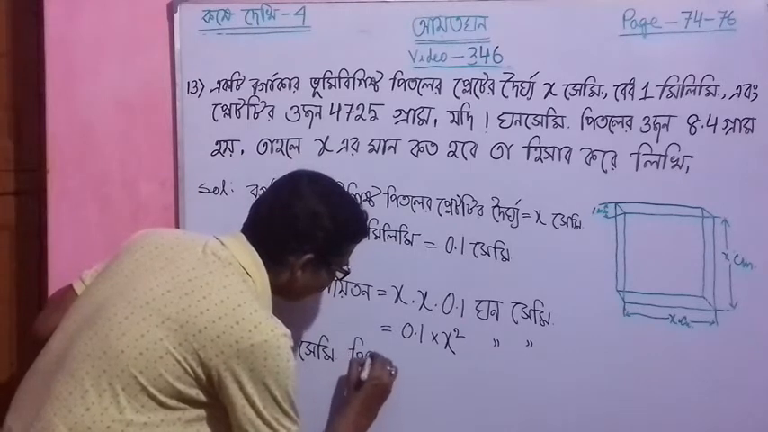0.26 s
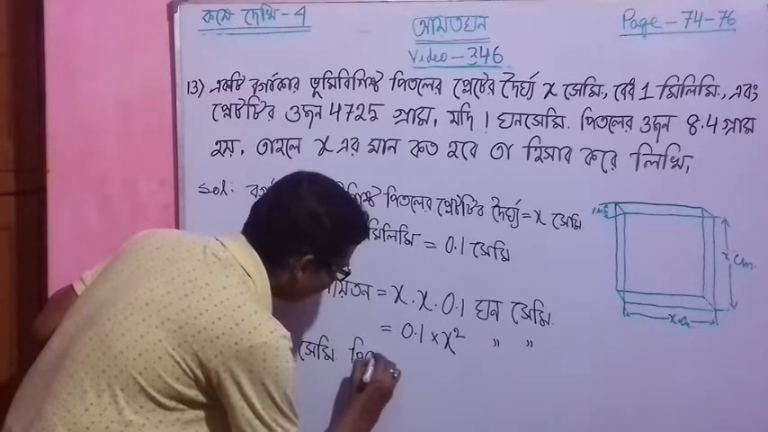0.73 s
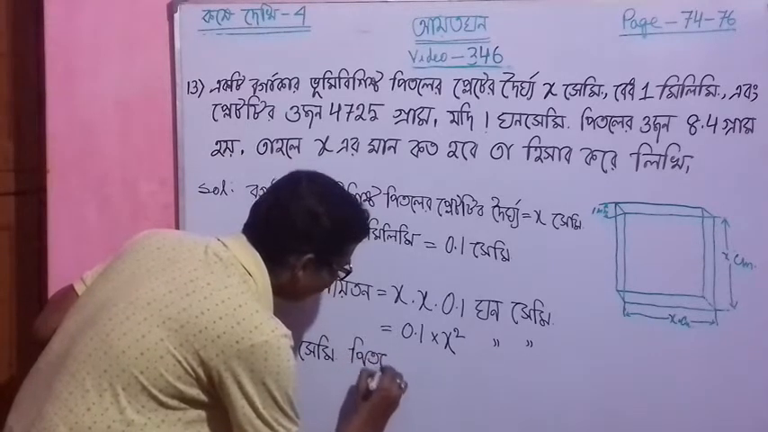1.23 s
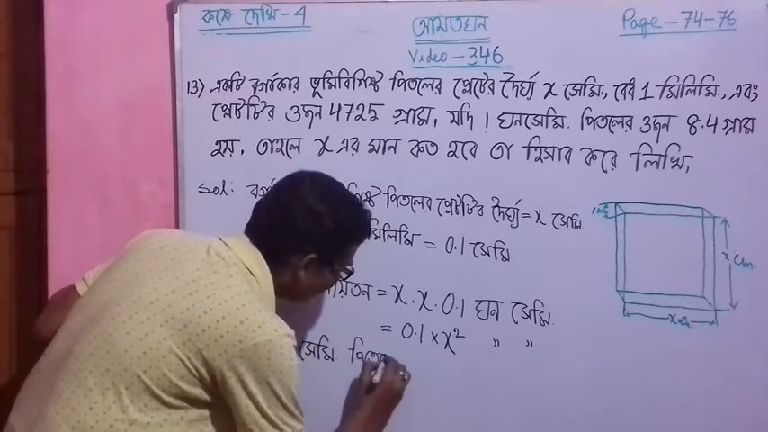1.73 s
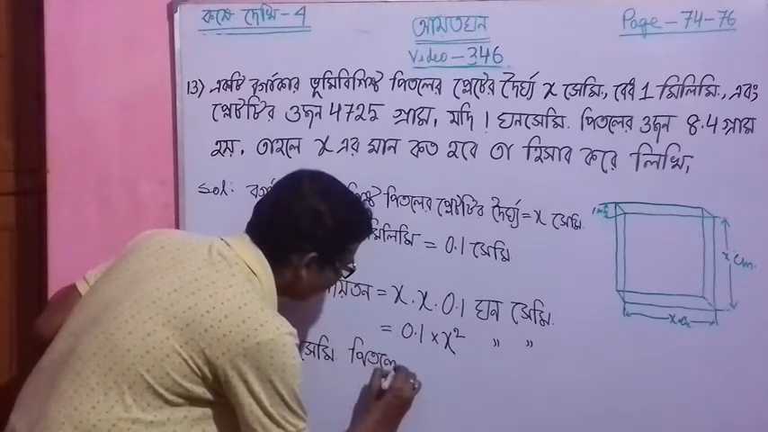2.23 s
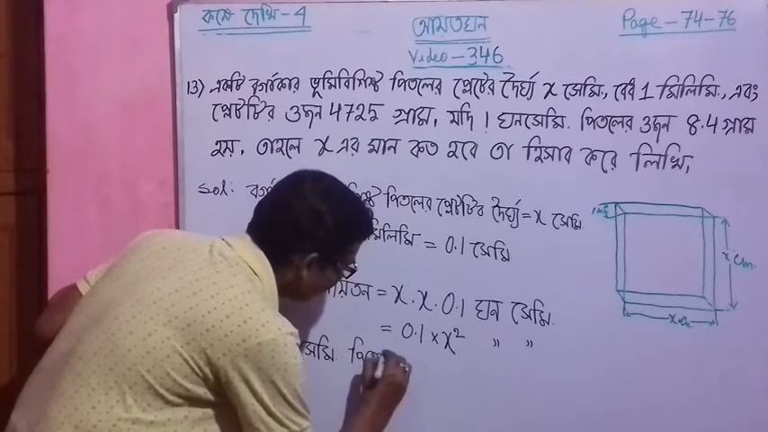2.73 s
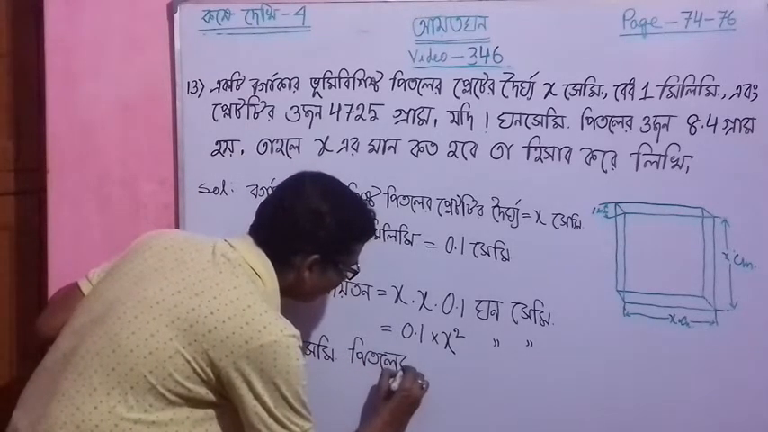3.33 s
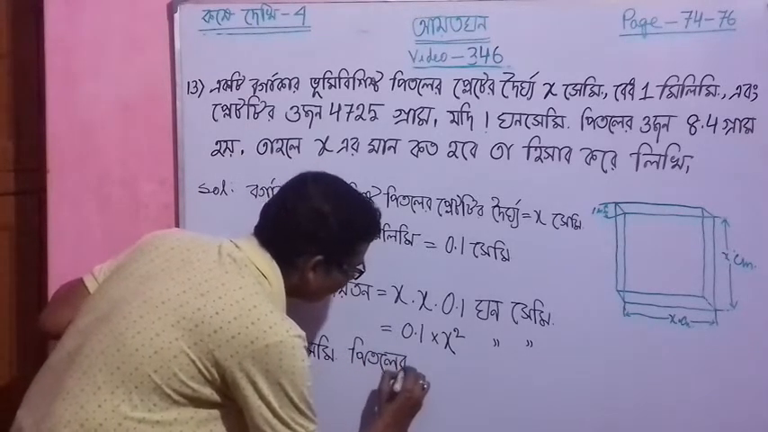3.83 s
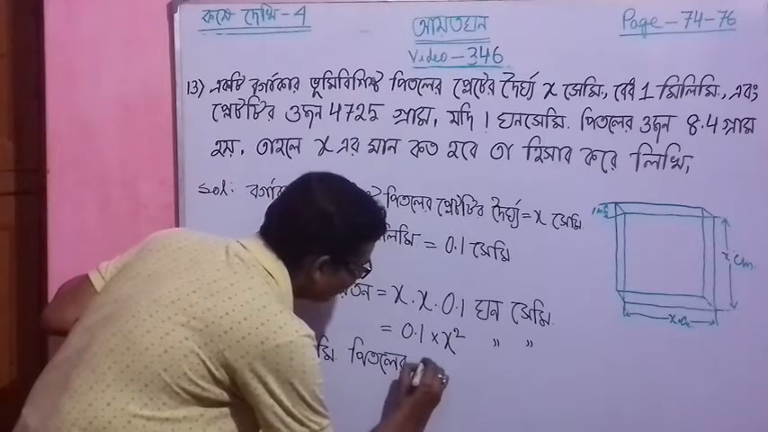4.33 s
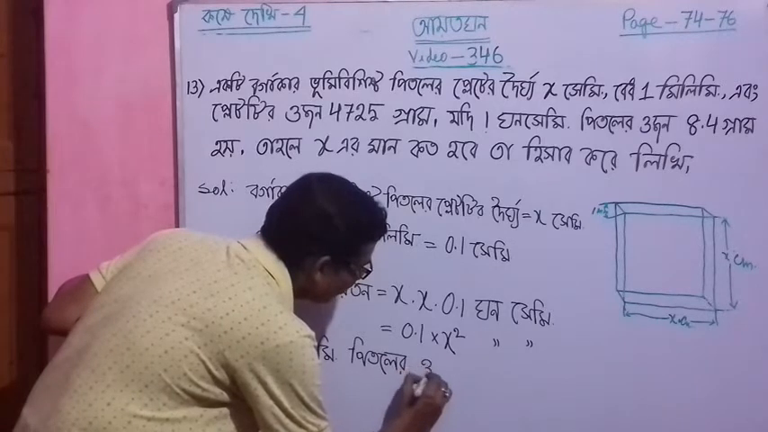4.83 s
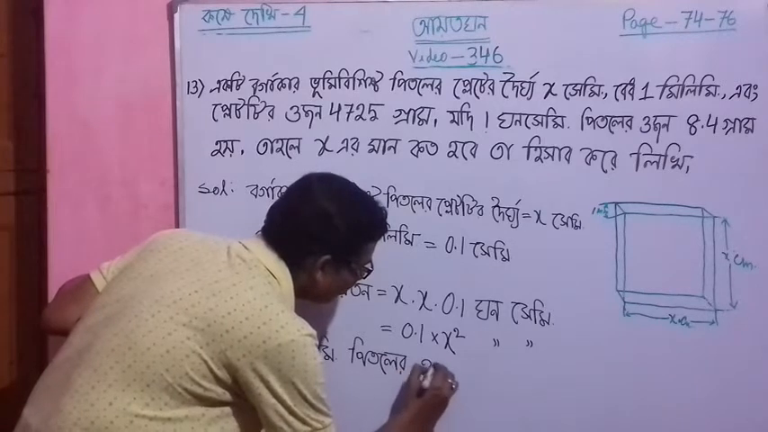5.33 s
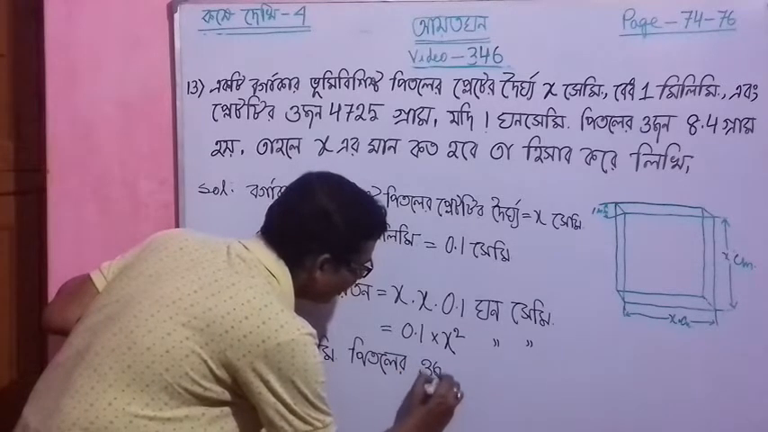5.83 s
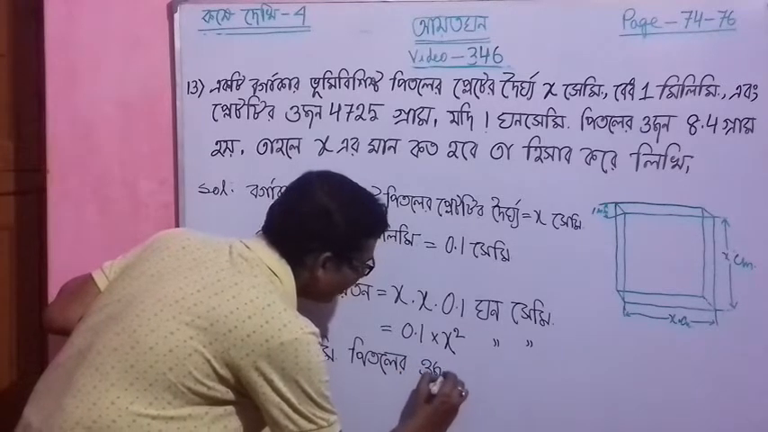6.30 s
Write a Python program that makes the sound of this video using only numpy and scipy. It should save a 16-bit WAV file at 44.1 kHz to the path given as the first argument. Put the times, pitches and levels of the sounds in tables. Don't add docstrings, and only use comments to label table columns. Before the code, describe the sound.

A marker writes on a hollow hanging whiteboard, close to a single microphone, over steady soft room tone, low fan hum and faint hiss. From 0 to 0.7 s the felt nib rubs in a low, droning, raspy stroke with small hissing sweeps. At 0.9 s a hard hollow knock booms through the board and room, then short strokes follow. A medium knock lands at 1.6 s, with quick rubs and light taps until a firm dull knock at 2.8 s. A longer scratchy stroke follows, then brief ones. Another knock comes at 3.75 s and a softer, lower one at 4.2 s, before steady rubbing. At 5.28 s the hardest, very short knock hits with a low second knuckle bump right behind. Light taps and tiny dry barrel creaks scatter from 5.6 to 5.95 s. A faint low landing at 6.2 s leads into a final soft stroke.

```python
import sys
import numpy as np
from scipy import signal
from scipy.fft import rfft, irfft, next_fast_len
from scipy.io import wavfile
from scipy.ndimage import map_coordinates

SR = 44100
rng = np.random.default_rng(int(sys.argv[2]) if len(sys.argv) > 2 else 0)


def bounce(signal):
    frames = np.transpose(np.atleast_2d(signal))
    limited = np.clip(frames, -1, 1)
    pcm = np.round(limited * 32767).astype(np.int16)
    wavfile.write(sys.argv[1], SR, pcm)


def gain_from_db(level_db):
    decades = np.asarray(level_db, float) / 20
    return 10 ** decades


N = 289296
TOP_HZ = 15760


def unit(x):
    return x / np.sqrt(np.mean(x ** 2) + 1e-20)


def along(points, hz):
    f, v = np.transpose(points)
    return np.interp(np.log(hz + 1), np.log(f + 1), v)


def filtered(x, response):
    m = next_fast_len(len(x) + 8192)
    return irfft(rfft(x, m) * response(np.fft.rfftfreq(m, 1 / SR)), m)[:len(x)]


def modes(rows):
    def response(f):
        total = 0
        for k, (hz, width, db) in enumerate(rows):
            damping = 1j * f * width
            total = total + (-1) ** k * gain_from_db(db) * damping / (hz * hz - f * f + damping)
        return total
    return response


def sharp(x, hz, width):
    return unit(filtered(x, lambda f: modes([(hz, width, 0)])(f) ** 2))


def hiss(spectrum):
    def response(hz):
        return gain_from_db(along(spectrum, hz)) * (hz < TOP_HZ) * (hz > 24)
    return unit(filtered(rng.standard_normal(N), response))


def wobble(rate):
    knots = rng.standard_normal(int(N * rate / SR) + 4)
    return map_coordinates(knots, [np.arange(N) * rate / SR])


# (frequency [Hz], density [dB per Hz])
ROOM_TONE = [(20, -46), (40, -12.5), (165, -0.5), (540, -7.5), (1280, -12.5), (1450, -14), (2500, -16.5),
             (3400, -21), (6500, -26), (8000, -31), (10000, -28), (15700, -28)]
# (frequency [Hz], width [Hz], level [dB])
FAN_HUM = [(74.8, 11, -71.5), (144.2, 9, -68)]


def room():
    tone_db = -58
    tone = gain_from_db(tone_db) * gain_from_db(.4 * wobble(3)) * hiss(ROOM_TONE)
    fan = np.zeros(N)
    for hz, width, db in FAN_HUM:
        fan += gain_from_db(db) * unit(filtered(rng.standard_normal(N), modes([(hz, width, 0)])))
    return tone + fan


# (frequency [Hz], density [dB per Hz])
CHANNEL_HISS = [(15, -49), (25, -15.5), (152, -2.5), (1090, -4.5), (1720, -3.5), (4800, -9), (8450, -14),
                (15700, -12.5)]


def amplifiers():
    level_db = -65.5
    apart = gain_from_db(level_db) * hiss(CHANNEL_HISS)
    return np.array([apart, -apart])


def played(rows, attack_s, release_s, gain_db=0):
    linger_db, linger_t60_s = -15.5, .7
    s, length, db = np.transpose(rows)[:3, :, None]
    t = np.arange(N * 1000 // SR + 2) / 1000 - s
    rise = np.sin(np.pi / 2 * np.clip(t / attack_s + .5, 0, 1)) ** 2
    after = np.maximum(t - length, 0)
    fall = gain_from_db(-2 * 60 * after / release_s) + gain_from_db(2 * (linger_db - 60 * after / linger_t60_s))
    return rise ** 2 * gain_from_db(2 * (db + gain_db)) * fall


# (start [s], length [s], pressure [dB], spot on the board [Hz])
INK_LINES = [(0, 0.71, -55.5, 990), (0.943, 0.41, -57.5, 865), (1.405, .04, -68, 870),
             (1.676, 0.32, -56, 890), (2.041, .28, -57.5, 875), (2.367, 0.2, -55, 900),
             (2.56, 0.13, -64.5, 850), (2.835, 0.48, -57.5, 860), (3.41, 0.16, -56, 825),
             (3.58, 0.088, -62.5, 850), (3.798, .08, -59, 840), (4.28, 0.38, -55, 1040),
             (4.712, .37, -56, 1080), (5.08, 0.072, -68, 1080), (5.39, 0.56, -55.5, 970),
             (5.95, 0.12, -62, 1010), (6.24, .34, -58, 930)]
# (start [s], length [s], pressure [dB], spot on the board [Hz])
TURN_LEANS = [(0, .04, -57, 1110), (0.114, 0.042, -58, 1130), (0.368, 0.063, -50, 1040),
              (0.935, 0.027, -49, 760), (1.809, 0.066, -48.5, 1000), (2.044, .03, -47.5, 875),
              (2.108, 0.082, -48, 910), (2.488, 0.043, -46.5, 790), (2.995, .04, -52, 1000),
              (3.41, 0.032, -55, 1180), (3.528, 0.035, -51.5, 775), (4.362, 0.071, -51, 1050),
              (4.718, 0.019, -47, 1090), (4.887, 0.063, -52.5, 1080), (5.01, 0.04, -51, 1160),
              (5.392, 0.048, -49.5, 770), (5.781, 0.037, -46, 1140), (6.413, .15, -51.5, 1010),
              (6.49, 0.045, -47, 1000)]
# (start [s], length [s], grip [dB], slant of the pen [0-1])
NIB_SWEEPS = [(0.028, 0.066, -65, 0.7), (.16, 0.077, -64, 0.6), (0.305, 0.065, -64.5, 0.14),
              (0.454, .1, -62, .8), (0.607, .09, -61, 0.55), (0.967, 0.07, -68.5, .8),
              (1.11, 0.11, -67, .5), (1.22, 0.11, -63.5, .55), (1.3, 0.069, -60, 0.35),
              (1.41, 0.035, -68, .6), (1.7, 0.13, -67, 0.26), (1.897, 0.073, -62, 0.46),
              (2.04, 0.08, -62.5, 0.3), (2.204, 0.1, -64.5, .4), (2.373, .08, -61, 0.2),
              (2.45, 0.057, -58.5, .6), (2.835, .13, -65, 0.9), (2.949, 0.067, -65.5, 0.5),
              (3.09, 0.26, -67.5, 0.47), (3.414, .05, -59.5, 0.14), (3.457, 0.095, -62.5, 0.4),
              (4.33, 0.067, -67, .2), (4.427, 0.17, -65, 0.34), (4.759, 0.086, -64, 0.25),
              (4.938, 0.089, -61.5, 0.23), (5.463, 0.078, -63.5, 0.4), (5.602, 0.18, -66, 0.44),
              (5.857, 0.14, -62, 0.38), (6.38, .17, -68, 0.32)]
# (start [s], length [s], speed [dB])
WRIST_SWINGS = [(.03, 0.046, -69), (.58, .08, -65), (.96, .07, -69), (1.1, 0.15, -73), (1.26, 0.094, -64.5),
                (2.04, .04, -71), (2.13, .05, -73), (2.42, 0.064, -67), (2.87, 0.093, -62.5),
                (3.45, .1, -71), (3.8, 0.29, -75), (4.42, .2, -71.5), (4.93, 0.055, -63.5),
                (5.48, .07, -70), (5.88, .11, -64), (6.38, 0.11, -77)]


def hand():
    lines = played(INK_LINES, attack_s=.014, release_s=.18) + 1e-12
    leans = played(TURN_LEANS, attack_s=.03, release_s=.14)
    swings = played(WRIST_SWINGS, attack_s=.13, release_s=.45).sum(0)
    contacts = np.concatenate([lines, leans])
    pressure = contacts.sum(0)
    spot_hz = np.array([*INK_LINES, *TURN_LEANS])[:, 3]
    slant = np.clip(np.array(NIB_SWEEPS)[:, 3:], 0, 1)

    def woken_db(upright_db, slant_db, swing_db, line_db):
        sweeps = played(NIB_SWEEPS, .035, .2, upright_db + slant_db * slant).sum(0)
        return 10 * np.log10(sweeps + gain_from_db(2 * swing_db) * swings + gain_from_db(2 * line_db) * lines.sum(0))

    barrel_db = woken_db(.7, -8.5, -11.5, -17)
    tip_db = woken_db(-9, 11.5, -7.5, -19)
    felt_db = woken_db(-21.5, 4.5, -2, -20.5)
    controls = 10 * np.log10(pressure), spot_hz @ contacts / pressure, barrel_db, tip_db, felt_db
    return [np.interp(np.arange(N) / SR, np.arange(len(c)) / 1000, c) for c in controls]


def slips(rate, spread_db):
    sizes = gain_from_db(spread_db * rng.exponential(size=N)) * rng.standard_normal(N)
    return sizes * (rng.random(N) < rate / SR)


# (frequency [Hz], width [Hz])
BOARD_DRONE = [(800, 297), (980, 390), (1190, 183)]


def board_drone(spot_hz):
    force = slips(rate=5000, spread_db=1.5) * gain_from_db(1.1 * wobble(60))
    drone = np.zeros(N)
    for hz, width in BOARD_DRONE:
        near = 0.066 + np.exp(-((spot_hz - hz) / 170) ** 2)
        drone += near * sharp(force, hz, width)
    return drone


def rasp(rows):
    fine = slips(rate=9000, spread_db=1.5)
    total = np.zeros(N)
    for hz, width, db in rows:
        total += gain_from_db(db + 1.3 * wobble(18)) * sharp(fine, hz, width)
    return unit(total)


# (frequency [Hz], density [dB per Hz])
FELT_HISS = [(4000, -12), (5000, -4), (6500, 0), (8000, -7), (9900, -2), (12000, -6), (15700, -6)]


def felt_hiss():
    felt = hiss(FELT_HISS)
    coarse = filtered(felt, lambda f: 1 / (1 + (f / 8000) ** 8))
    return gain_from_db(1.5 * wobble(11)) * coarse + gain_from_db(1.5 * wobble(11)) * (felt - coarse)


# (frequency [Hz], width [Hz], level [dB])
PEN_BODY = [(2020, 540, -6), (2595, 550, 0)]
# (frequency [Hz], width [Hz], level [dB])
NIB_HOLDER = [(3990, 600, 0.5), (4286, 590, -8), (5900, 1300, -9.5)]


def strokes():
    drone_db, spot_hz, barrel_db, tip_db, felt_db = hand()
    drone = gain_from_db(drone_db - 2.0) * board_drone(spot_hz)
    rub = slips(rate=3200, spread_db=1.5)
    belly = unit(filtered(rub, modes([(256, 260, 0.5), (510, 267, 8.4)])))
    belly *= gain_from_db(drone_db / 2 + barrel_db / 2 + 3.5)
    pen = gain_from_db(barrel_db + 2.5) * rasp(PEN_BODY) + gain_from_db(tip_db + 1.0) * rasp(NIB_HOLDER)
    felt = gain_from_db(felt_db + 1.6 * wobble(32)) * felt_hiss()
    return drone + belly + pen + felt


# (frequency [Hz], level [dB])
BOOM_RESPONSE = [(40, -17.5), (150, 0), (300, -1), (450, -2.5), (650, 1), (1000, 5), (1600, -12),
                 (4000, -32), (9000, -61.5)]
# (frequency [Hz], t60 [s])
BOOM_DECAY = [(60, 0.52), (150, 1), (300, 0.56), (500, 0.59), (1000, 0.27), (2000, 0.29)]
# (frequency [Hz], level [dB], t60 [s])
BOARD_MODES = [(153.3, -7.5, 1), (186.6, -9.5, 1), (226, -13, 0.87), (248, -10.5, 0.6), (287.6, -9, 0.73),
               (327, -2, 0.42), (360, -3, 0.34), (402.2, -3.5, 0.29), (433, -23, 0.38)]


def boom(thud, t):
    f, u, z = signal.stft(rng.standard_normal(len(t)), SR, nperseg=256)
    decay = gain_from_db(-60 * u / along(BOOM_DECAY, f)[:, None])
    tail = signal.istft(z * decay, SR, nperseg=256)[1][:len(t)]
    ring = np.zeros(len(t))
    for hz, db, t60 in BOARD_MODES:
        strength_db, start = rng.normal(0, 2.5), rng.random()
        ring += gain_from_db(db + strength_db - 60 * t / t60) * np.sin(2 * np.pi * (hz * t + start))
    tail = tail / np.std(tail[:SR // 10]) + gain_from_db(-12.0) * ring
    tail = filtered(tail, lambda g: gain_from_db(along(BOOM_RESPONSE, g)))
    build_up = 1 - np.exp(-(t / 0.0046) ** 2)
    tail = signal.fftconvolve(tail * build_up, thud[:SR // 100])[:len(t)]
    return tail / np.std(tail[:SR // 10])


# (delay [s], level [dB])
FLUTTER = [(.030, -19.5), (.061, -15.5), (.092, -20.5), (.122, -26.5)]


def knocks(rows, boom_db, octave_db, firm_loss, lasts_s):
    firm_db = -19
    out, t = np.zeros(N + SR), np.arange(int(lasts_s * SR)) / SR
    fade = np.cos(np.pi / 2 * t / t[-1]) ** .5
    for s, db, hz, t60, click_db in rows:
        swell = (1 - np.exp(-(t * hz * 1.1) ** 2)) * gain_from_db(-60 * t / max(t60, .003))
        thud = swell / swell.max() * np.sin(2 * np.pi * hz * t)
        thud += gain_from_db(-24) * np.sin(2 * np.pi * 55 * t) * gain_from_db(-60 * t / 0.039)
        after_db = boom_db + octave_db * np.log2(hz / 400) - firm_loss * max(db - firm_db, 0)
        after = gain_from_db(after_db) * boom(thud, t)
        for delay_s, echo_db in FLUTTER:
            after += gain_from_db(echo_db) * np.roll(thud, round(delay_s * SR))
        chance = rng.standard_normal(len(t))
        click = gain_from_db(-60 * t / 0.04) * filtered(chance, modes([(2200, 830, 7.6)]))
        rattle = gain_from_db(3.5 - 60 * t / 0.17) * sharp(chance, 950, 600)
        contact = thud + gain_from_db(click_db) * (click + rattle) + after
        out[round(s * SR):][:len(t)] += gain_from_db(db) * fade * contact
    return out[:N]


# (time [s], peak [dB], thud [Hz], thud t60 [s],
# tip hardness [dB])
LIGHT_TOUCHES = [(0.0636, -36, 655, 0.017, -30), (0.876, -38, 278, 0.03, -36),
                 (1.2986, -33.5, 380, 0.0086, -26), (1.413, -36.5, 420, 0.005, -23),
                 (2.0396, -39, 394, 0.01, -18), (2.061, -33.5, 864, 0.022, -30),
                 (2.1584, -36, 836, 0.055, -19), (2.3764, -41.5, 1040, 0.04, -9),
                 (2.5012, -35.5, 750, 0.022, -19), (3.051, -43, 354, 0.015, -26),
                 (3.4126, -43.5, 1070, 0.028, -22), (3.7376, -32, 344, 0.0092, -20),
                 (4.719, -37, 1126, 0.042, -18), (5.2732, -27, 417, 0.0083, -20),
                 (5.6368, -32, 454, 0.01, -27), (5.729, -31.5, 570, 0.0051, -15.5),
                 (5.8456, -33.5, 434, 0.0083, -15.5), (5.8972, -36.5, 310, 0.011, -25),
                 (6.1836, -38.5, 450, 0.013, -23),
                 (4.2008, -21.5, 410, 0.0069, -26.5),
    (5.6, -40, 356, 0.022, -22),
    (5.2805, -22, 980, 0.016, -42),
    (1.6215, -30, 800, 0.017, -28),
    (5.284, -16, 313, 0.035, -36),
]


def touches():
    rows = LIGHT_TOUCHES
    return knocks(rows, boom_db=-21, octave_db=-8.5, firm_loss=.1, lasts_s=0.38)


# (time [s], peak [dB], thud [Hz], thud t60 [s], tip hardness [dB])
FIRM_LANDINGS = [
    (0.888, -6.5, 441, 0.0205, -43),
    (1.6206, -13.5, 401, 0.017, -36),
    (2.7772, -9, 418, 0.023, -44),
    (3.759, -12, 385, 0.014, -39.5),
    (4.2038, -19, 349, 0.02, -40),
    (5.2792, -5, 466, 0.0071, -39.5),
    (6.208, -30, 286, 0.015, -42),
]


def landings():
    return knocks(FIRM_LANDINGS, boom_db=-18, octave_db=1, firm_loss=0.47, lasts_s=0.92)


# (time [s], level [dB], frequency [Hz])
CREAKS = [
    (5.727, -36, 1930),
    (5.7298, -42, 12300),
    (5.808, -36, 2500),
    (5.8453, -29.5, 1920),
    (5.854, -61, 1500),
    (5.95, -41, 4500),
]


def ticks():
    out, t = np.zeros(N), np.arange(SR // 50) / SR
    for s, db, hz in CREAKS:
        snap = np.exp(-t * hz ** .5 * 30) * np.sin(2 * np.pi * hz * t)
        out[round(s * SR):][:len(t)] += gain_from_db(db) * snap
    return out


def scene():
    blows = touches() + landings() + ticks()
    blows = filtered(blows, lambda f: (f < TOP_HZ) * 1j * f / (50 + 1j * f))
    mono = room() + strokes() + blows
    return np.array([mono, mono])


def top_cut(x):
    return signal.sosfilt(signal.butter(12, 15940, fs=SR, output="sos"), x)


def record(dry):
    mix = dry + amplifiers() - .0006
    return top_cut(mix)


dry = scene()
out = record(dry)
bounce(out)
```